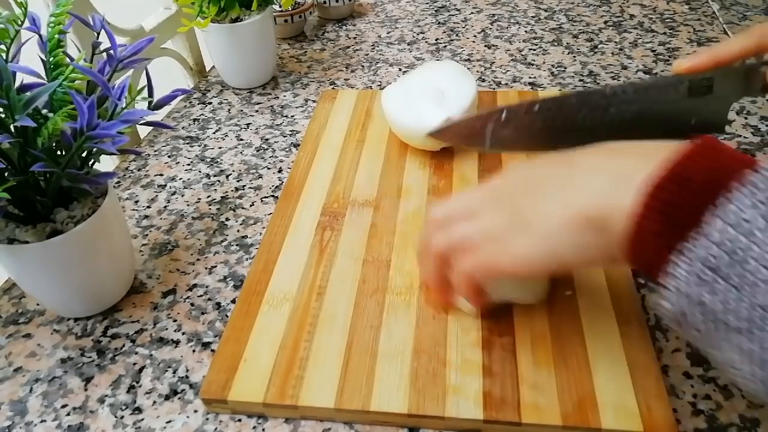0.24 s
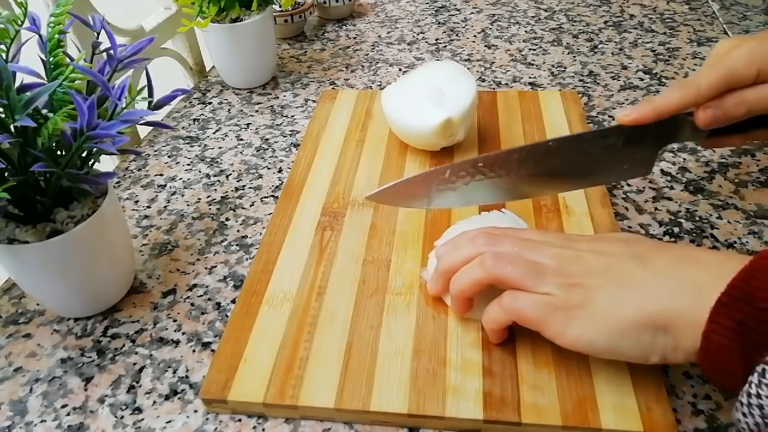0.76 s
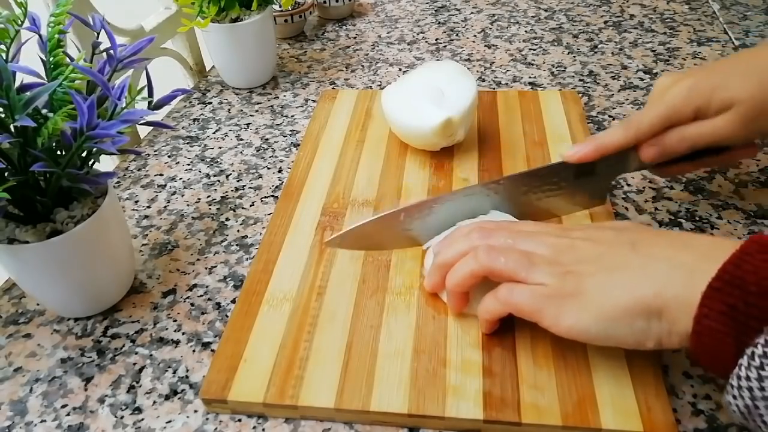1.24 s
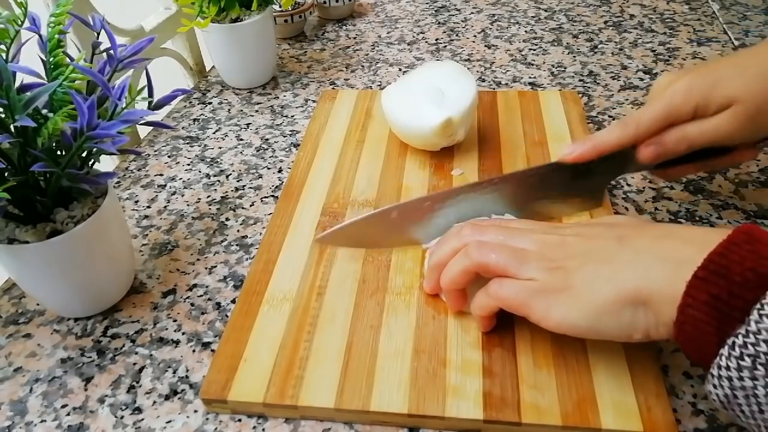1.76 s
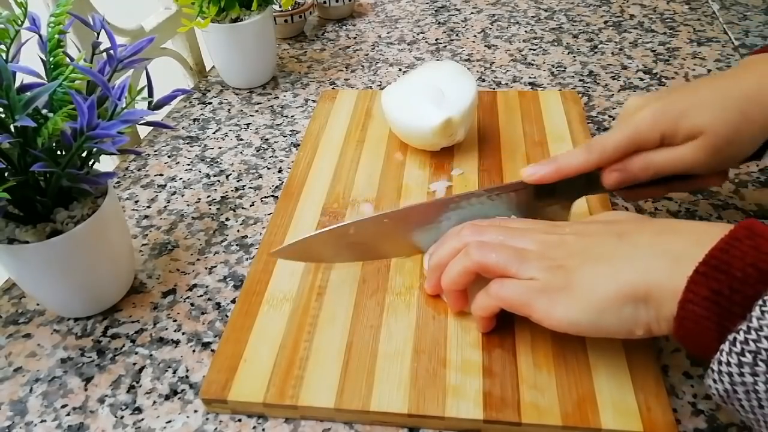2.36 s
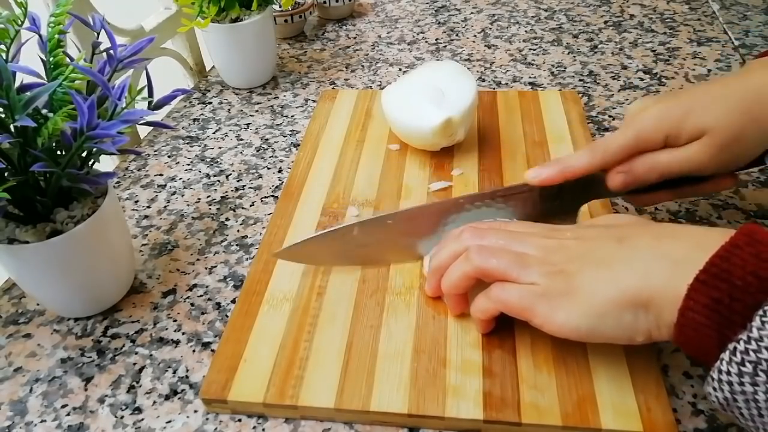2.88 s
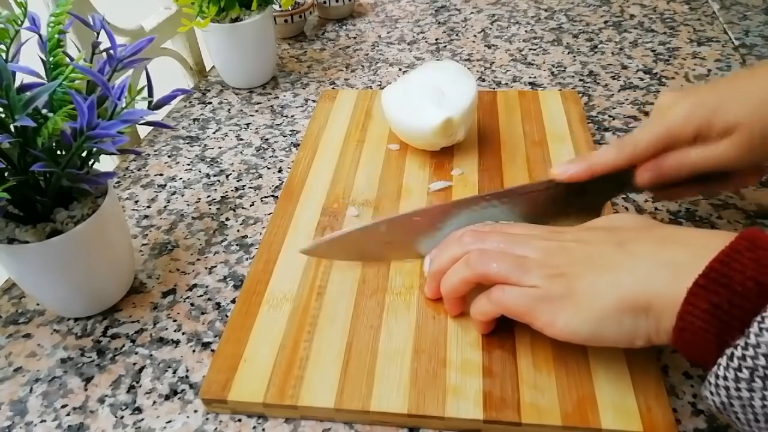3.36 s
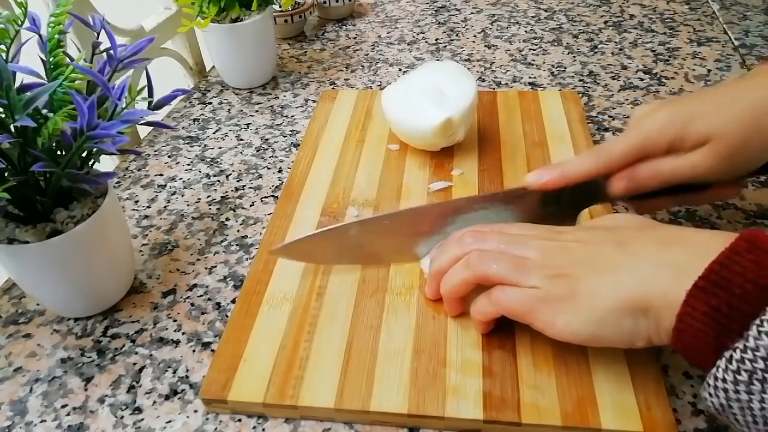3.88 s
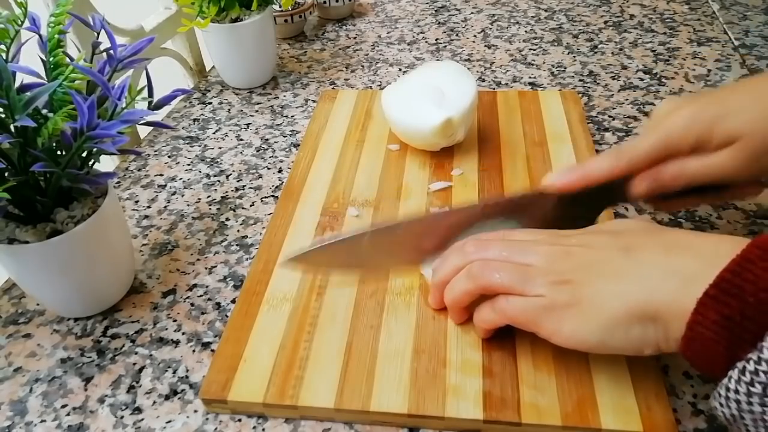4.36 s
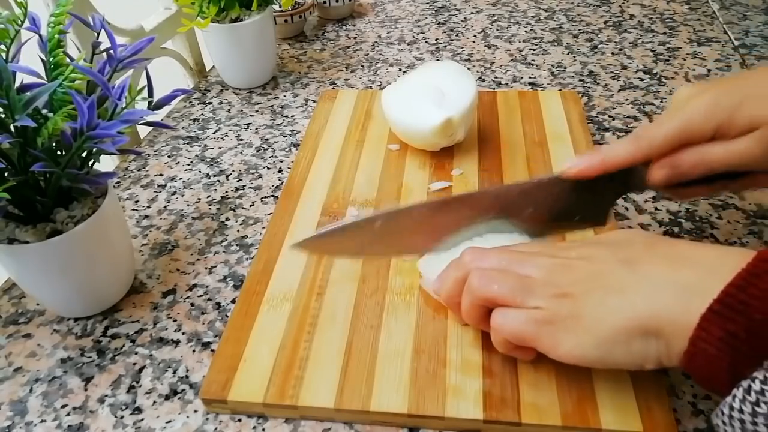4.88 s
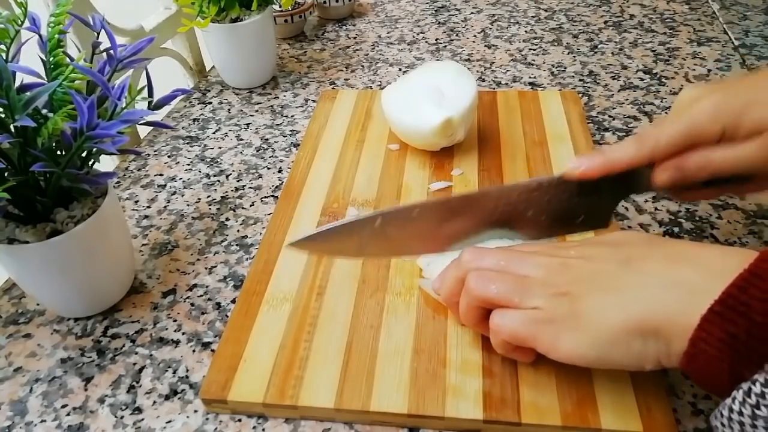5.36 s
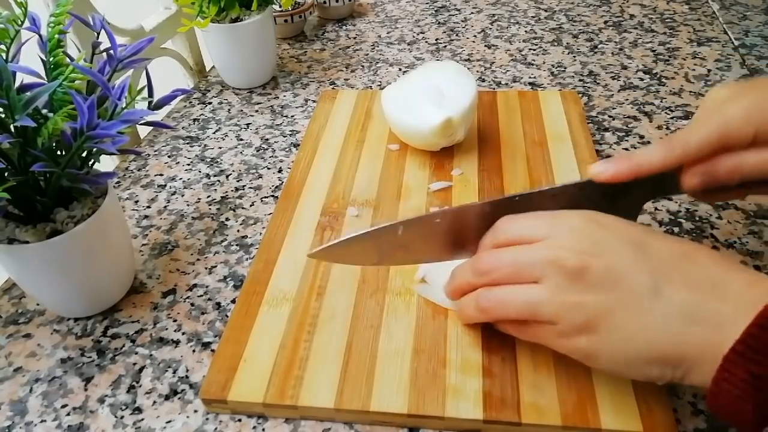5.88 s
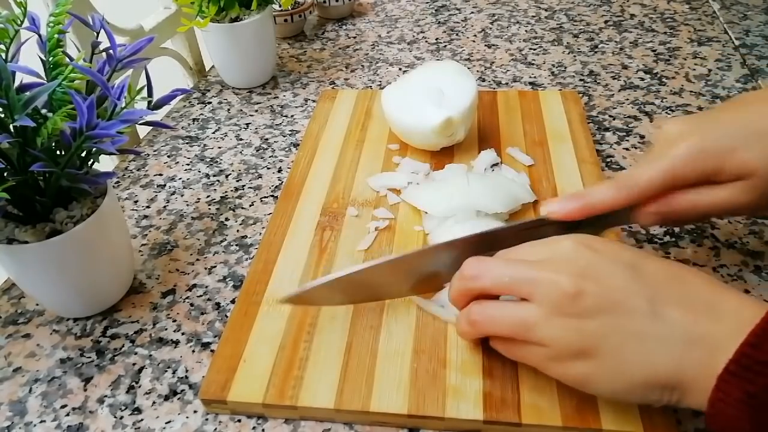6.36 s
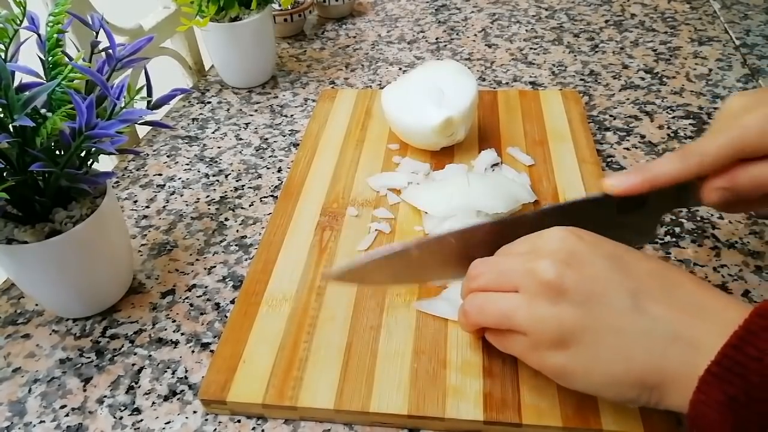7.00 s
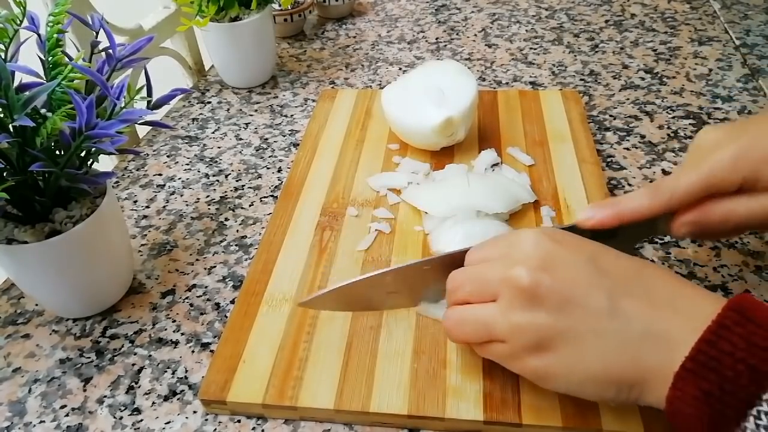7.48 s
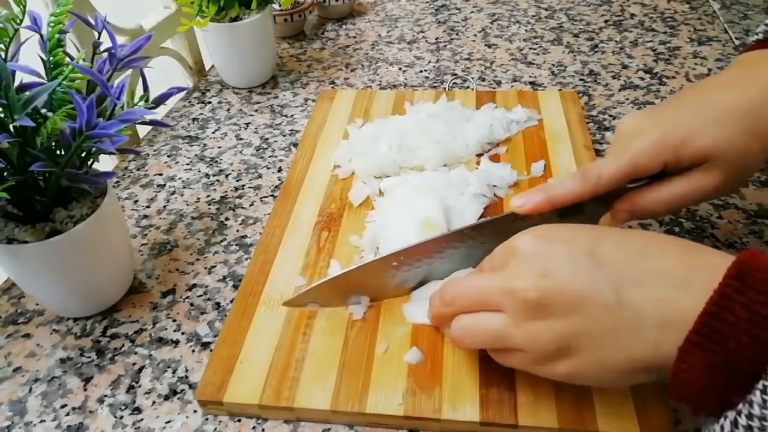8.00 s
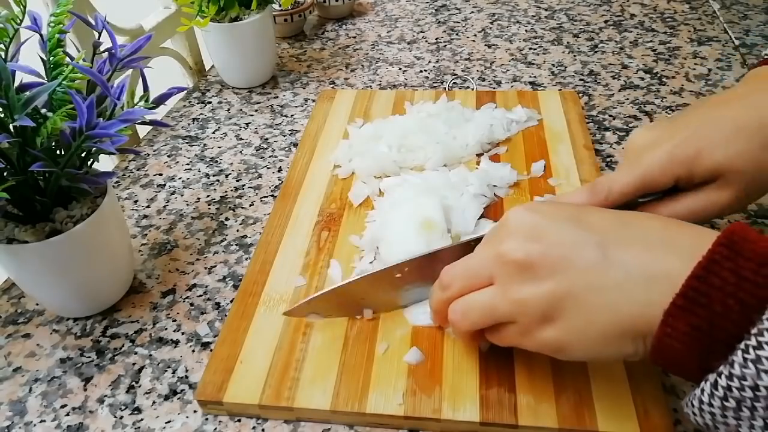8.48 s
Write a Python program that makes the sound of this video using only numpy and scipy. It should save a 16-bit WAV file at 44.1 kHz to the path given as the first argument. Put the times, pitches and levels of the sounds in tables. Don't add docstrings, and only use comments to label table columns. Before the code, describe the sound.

A phone-like stereo microphone sits close to a wooden board on a stone counter. Faint motor hum dies first, then onion layers crackle and snap before each hollow blade knock, some dull, some sharp and bright. Soft hand nudges fall between strokes. Short room echoes and constant hiss surround everything; after a fade and cut, quieter chops resume.

```python
import sys
import numpy as np
from scipy import signal
from scipy.fft import rfft, irfft, next_fast_len
from scipy.io import wavfile
from scipy.ndimage import uniform_filter1d

SR = 44100
rng = np.random.default_rng(int(sys.argv[2]) if len(sys.argv) > 2 else 0)


def waveform_to_disk(signal):
    frames = np.transpose(np.atleast_2d(signal))
    scaled = np.clip(frames, -1, 1) * 32767
    samples = np.round(scaled).astype(np.int16)
    wavfile.write(sys.argv[1], SR, samples)


def ratio_of_db(decibels):
    return 10 ** (np.asarray(decibels, float) / 20)


N = 385434
TIME = np.arange(N) / SR

BLOWS = [(0.9841, -24.5, -4, -14, -11.5), (1.6504, -31, -1.5, -43, -22), (2.1265, -24, 0.5, -11, -21),
         (2.689, -21, 3, -8, -16.5), (3.1854, -19, 9.5, 13, -5.5), (3.7419, -22, -7, -8.5, -23),
         (4.2673, -22.5, 0, -10, -25), (4.7775, -19, 8, 6, -14), (5.3318, -30.5, -13, -34, -16),
         (5.8600, -31, 2, -35, -25), (6.6064, -25.5, 4, 1, -19), (7.0392, -26.5, -3.5, -23, -15.5),
         (7.3533, -31.5, -3.5, -25, -20), (7.7064, -26.5, 5, 8.5, -12), (8.19, -28, 3.5, 3, -13),
         (8.6223, -28, 4.5, 0.5, -18)]
# rise/s, hold/s, crackle level/dB, crunch and rumble level/dB re crackle
SLICES = [(0.058, 0.0084, -41.5, -11, -20), (0.14, .045, -46, -9.5, -26), (0.064, 0.087, -47.5, -5.5, -17),
          (0.19, 0.017, -47, -2, -14), (0.05, 0.012, -48.5, -3.5, -13), (0.19, 0.028, -47, -2, -8),
          (0.079, 0.066, -45, -3, -9.5), (0.086, 0.039, -43, -6.5, -16.5), (0.14, 0.062, -46, -2.5, -11.5),
          (0.026, 0.013, -43.5, -4, -8), (0.025, 0.0094, -52, -3.5, -29), (.04, 0.083, -54, -7, -6),
          (.03, 0.012, -53.5, -7.5, -20), (0.12, 0.034, -58, -4, -14), (.05, 0.042, -53.5, -2.5, -20),
          (0.055, 0.028, -52.5, -4, -11)]
# t/s, peak level/dB, low part level/dB re peak
SNAPS = [(0.9128, -42, -21), (0.9527, -41, 0), (1.6043, -44, -22), (1.6476, -34, -22), (2.0524, -36, -14),
         (2.0788, -28, -19), (2.609, -41, 0), (2.637, -46, 12), (2.6614, -36, 8), (3.6947, -59.5, -15.5),
         (4.1679, -38.5, -17), (4.19, -33.5, -23), (4.1944, -30, -20), (4.2026, -29.5, -32),
         (4.7272, -42, -13), (4.7667, -36, 6), (5.2679, -37, 7), (5.5498, -41, -9), (5.8468, -34, -4),
         (7.886, -40, -21)]
# f/Hz, level/dB, t60/s
LOW_MODES = [(275, -30, 0.01), (322, -14, 0.042), (476, 7.5, 0.07), (560, 5, 0.1), (644, 10.5, 0.039)]
MID_MODES = [(790, -2, 0.18), (948, 9.5, 0.058), (1054, 18.5, 0.036), (1080, -30.5, 0.06),
             (1190, 3.5, 0.016), (1300, -0.5, .022)]
HIGH_MODES = [(1450, -5.5, 0.0083), (1414, 35.5, 0.025), (1700, 0.5, 0.029), (1597, 32.5, 0.078),
              (1676, 10.5, .02), (1980, -12, .02), (2055, 1, 0.026), (2200, 14, 0.033),
              (2480, -6.5, 0.0062), (3100, -11.5, .015)]
# f/Hz, level/dB, t60/s
FLEX_MODES = [(303, 2, 0.45), (316.7, 4.5, 0.29)]
# f/Hz, level/dB, t60/s
THUD_MODES = [(55, 6, 0.1), (85, 4, 0.036)]
# t/s, f/Hz, level/dB
HUM = [
    (0.03, 118, -88),
    (0.1, 117.5, -72.5),
    (0.72, 113, -68),
    (0.86, 111, -81),
]
# t/s, f/Hz, level/dB
SQUEAK = [
    (8.41, 700, -94),
    (8.432, 758, -64),
    (8.492, 724, -57),
    (8.51, 700, -65),
    (8.54, 720, -61),
]
# t/s, peak level/dB, f/Hz
NUDGES = [
    (0.15, -52.5, 390),
    (0.283, -53, 328),
    (2.441, -50, 323),
    (2.476, -51, 410),
    (2.52, -51, 318),
    (2.553, -47, 370),
    (5.62, -50.5, 347),
    (5.684, -52, 360),
    (5.735, -52, 320),
    (8.486, -46, 392),
]
# f/Hz, t60/s
ROOM_T60 = [(150, 1), (400, 0.39), (1000, 0.55), (2500, .3), (6000, 0.41)]
# t/s, level/dB above tail
WALL_ECHOES = [
    (.0095, 2),
    (0.028, 8),
    (.068, 3),
]
# f/Hz, density level/dB per Hz
HISS = [(25, -8.5), (60, -6), (130, -9.5), (300, -1.5), (480, -4), (650, -7.5), (1050, -2.5), (1600, -5.5),
        (2250, -8), (2700, -6), (3300, -10.5), (7000, -9.5), (10000, -10.5), (12000, -10)]
# f/Hz, correlation/1
HISS_LIKENESS = [(60, 0.33), (130, 0.098), (300, 0.3), (600, 0.11), (1200, 0.73), (2500, 0.44),
                 (7000, 0.13)]

SINK_S = 0.0009
BACK_S = 7.509


def blows():
    board, crack, counter = np.zeros((2, N)), np.zeros(N), np.zeros(N)
    scatter_db, counter_db = 1.5, -27
    for s, db, mid_db, high_db, tick_db in BLOWS:
        add(board, ratio_of_db(db) * board_knock(mid_db, high_db, scatter_db), s + SINK_S)
        flex = ring(FLEX_MODES, scatter_db, 0.27, 0.00033, detune=0.012)
        add(board, ratio_of_db(db - 14.5) * pan(flex, 5.0), s + SINK_S)
        tick = pan(burst(2300, 16000, 0.038), 3.9)
        add(board, ratio_of_db(db) * ratio_of_db(tick_db) * tick, s + SINK_S / 2)
        add(crack, ratio_of_db(db) * contact_crack(mid_db, high_db, tick_db), s - SINK_S)
        ring_s = BACK_S - s if s < BACK_S else 1
        add(counter, ratio_of_db(db + counter_db) * counter_ring()[:int(ring_s * SR)], s)
        add(counter, ratio_of_db(db + counter_db - 1.0) * ring(THUD_MODES, scatter_db, 0.13, 0.0027), s)

    direct_db, direct_pan_db = 14, 3.5
    direct = np.roll(crack, int(2 * SINK_S * SR) - 118)
    board = board - ratio_of_db(direct_db) * pan(direct, direct_pan_db)
    slap_delay_s, slap_db = 0.0041, -4.5
    board = board + ratio_of_db(slap_db) * np.roll(board, int(slap_delay_s * SR), axis=1)

    counter_pan_db, wobble_db, right_lag_s = 0, 3, 0.0004
    counter = pan(band(counter, 42, 500) * ratio_of_db(wobble_db * walk(size=1200)), counter_pan_db)
    counter[1] = np.roll(counter[1], int(right_lag_s * SR))
    bass_cut = signal.butter(4, 240, "highpass", fs=SR, output="sos")
    crack = signal.sosfilt(bass_cut, signal.sosfilt(bass_cut, crack))
    return signal.sosfilt(bass_cut, board) + counter, crack


def board_knock(mid_db, high_db, scatter_db):
    low_pan_db, mid_pan_db, high_pan_db = 1.5, 5.3, 2.6
    grain = 0.5
    low = ring(LOW_MODES, scatter_db, 0.1, 0.00015)
    mid = ring(MID_MODES, scatter_db, 0.1, 0.00019) + grain * burst(790, 1013, 0.028)
    high = ring(HIGH_MODES, scatter_db, 0.1, 0.0001) + grain * burst(870, 3300, 0.0084)
    knock = pan(low, low_pan_db)
    knock += ratio_of_db(mid_db) * pan(mid, mid_pan_db)
    knock += ratio_of_db(high_db) * pan(high, high_pan_db)
    return knock


def contact_crack(mid_db, high_db, tick_db):
    crack_hz = (330, 600, 1050, 2100, 4200)
    levels_db = (-1.5, -1.5, mid_db + 0.0, high_db - 7.0, tick_db - 13.5)
    size = 256
    hz = np.maximum(np.arange(size // 2 + 1) * SR / size, 1)
    pulse = irfft(ratio_of_db(on_log(hz, list(zip(crack_hz, levels_db)))))
    return np.roll(pulse, size // 2) * np.hanning(size)


def counter_ring():
    hz, beat_hz, beat_phase_rad, t60_s = 129, 5.0, 0.68, 1
    t = np.arange(SR) / SR
    swell = 1 - np.exp(-t / 0.0013)
    beat = np.cos(np.pi * beat_hz * t - beat_phase_rad)
    return swell * ratio_of_db(-60 * t / t60_s) * beat * np.sin(2 * np.pi * hz * t)


def onion():
    crackle, crunch, rumble = strokes()
    cells_per_s = 3500
    size_db = np.minimum(3.0 * rng.exponential(size=N), 12)
    cells = (rng.random(N) < cells_per_s / SR) * rng.standard_normal(N) * ratio_of_db(size_db)
    cells = unit(cells) + 0.48 * rng.standard_normal(N)
    high = crackle * ratio_of_db(-4.5) * unit(band(cells, 3000, 15000))
    flesh = ratio_of_db(-13) * unit(band(cells, 990, 1560))
    low = crunch * (unit(band(cells, 190, 4300)) + flesh)
    for s, db, low_db in SNAPS:
        add(high, ratio_of_db(db) * burst(3600, 15000, 0.003), s)
        add(low, ratio_of_db(db + low_db - 5.0) * burst(820, 1500, 0.016), s)
    rock = rng.standard_normal(N) + 0.59 * rng.standard_normal((2, N))
    rock = unit(band(rock, 30, 130))
    return pan(high, 12.3) + pan(low, 11.0), uniform_filter1d(rumble, size=1500) * rock


def strokes():
    rise_db, sag_db_per_s = 22.5, 16
    jerk_db, jerk_s = 3, 0.0078
    gains = np.zeros((3, N))
    for (lands, *_), (rise, hold, db, crunch_db, rumble_db) in zip(BLOWS, SLICES):
        since = TIME - (lands - hold)
        shape_db = np.where(since < 0, rise_db * since / rise, -sag_db_per_s * since)
        parts_db = np.array([[0], [crunch_db], [rumble_db]])
        gains += ratio_of_db(db + shape_db + parts_db) * (TIME < lands)
    jerks = [ratio_of_db(jerk_db * walk(size=int(jerk_s * SR))) for _ in range(2)]
    return gains[0] * jerks[0], gains[1] * jerks[1], gains[2]


def small_sounds():
    out = tone(HUM) + tone(SQUEAK)
    out = out * ratio_of_db(2.3 * walk(size=1500) * (TIME < HUM[-1][0]))
    for s, db, hz in NUDGES:
        modes = [(hz, 0, 0.09), (1.22 * hz, -3, 0.07)]
        add(out, ratio_of_db(db) * ring(modes, 1.0, 0.2, 0.0017), s)
    return out


def tone(track):
    phase = 2 * np.pi * np.cumsum(curve(track, 1, 100)) / SR
    return np.sqrt(2) * ratio_of_db(curve(track, 2, -120)) * np.sin(phase)


def room(x):
    spread_s, treble_pan_db = 0.0032, 3.5
    t = np.arange(SR // 2) / SR
    clusters_db = sum(db * np.exp(-((t - s) / spread_s) ** 2) for s, db in WALL_ECHOES)
    tail = 0
    for hz in 90 * 2 ** np.arange(7):
        shared, own = rng.standard_normal(len(t)), rng.standard_normal((2, len(t)))
        apart = min(0.28 + hz / 1200, 1)
        noise = np.sqrt(1 - apart ** 2) * shared + apart * own
        noise = band(noise, hz / np.sqrt(2), hz * np.sqrt(2))
        noise = pan(noise, treble_pan_db * min(hz / 2500, 1))
        tail = tail + noise * ratio_of_db(clusters_db - 60 * t / on_log(hz, ROOM_T60))
    tail = tail * np.clip((t - 0.002) / 0.0038, 0, 1)
    tail = tail / np.sqrt(np.sum(tail ** 2) / 2)
    before = TIME < BACK_S
    early = signal.fftconvolve((x * before)[None], tail, axes=1)[:, :N]
    late = signal.fftconvolve((x * ~before)[None], tail, axes=1)[:, :N]
    return early * before + late


def hiss():
    size = next_fast_len(N)
    hz = np.maximum(np.arange(size // 2 + 1) * SR / size, 1)
    like = np.clip(on_log(hz, HISS_LIKENESS), -1, 1)
    spectra = rfft(rng.standard_normal((2, size))) * ratio_of_db(on_log(hz, HISS))
    mid, side = spectra * np.sqrt([1 + like, 1 - like])
    noise = irfft(np.array([mid + side, mid - side]), size)[:, :N]
    low = band(noise, 300, 1400)
    return unit(noise + low * (ratio_of_db(1.3 * walk(size=3000)) - 1)) * ratio_of_db(-53)


def ring(modes, scatter_db, seconds, contact_s, detune=0.008):
    t = np.arange(int(seconds * SR)) / SR
    hz, db, t60 = np.array(modes).T[:, :, None]
    luck = rng.standard_normal((2, len(modes), 1))
    decay = ratio_of_db(db + scatter_db * luck[0] - 60 * t / t60)
    sound = -np.sum(decay * np.sin(2 * np.pi * hz * (1 + detune * luck[1]) * t), axis=0)
    sound = np.convolve(sound, np.hanning(int(contact_s * SR) + 3))[:len(t)]
    return sound / np.abs(sound).max()


def burst(lo_hz, hi_hz, t60):
    t = np.arange(SR // 10) / SR
    sound = band(rng.standard_normal(len(t)) * ratio_of_db(-60 * t / t60), lo_hz, hi_hz)
    return sound / np.abs(sound).max()


def walk(size):
    slow = uniform_filter1d(rng.standard_normal(N), size=size)
    return unit(uniform_filter1d(slow, size=size))


def band(x, lo_hz, hi_hz):
    return signal.sosfilt(signal.butter(2, [lo_hz, hi_hz], "bandpass", fs=SR, output="sos"), x)


def unit(x):
    return x / np.sqrt(np.mean(x ** 2))


def curve(table, column, rest):
    rows = np.array(table)
    return np.interp(TIME, rows[:, 0], rows[:, column], rest, rest)


def on_log(hz, table):
    rows = np.array(table)
    return np.interp(np.log(hz), np.log(rows[:, 0]), rows[:, 1])


def add(out, sound, s):
    i = int(s * SR)
    out[..., i:i + sound.shape[-1]] += sound[..., :N - i]


def pan(x, db):
    return x * ratio_of_db(np.array([[db], [-db]]) / 2)


def late_left(x):
    return np.array([np.roll(x[0], 16), x[1]])


def edit():
    fade_from_s, fade_to_s, mute_s = 5.85, 7.485, 7.449
    back_db, back_rise_s, silence_db = -3.5, 0.02, -43
    fade = np.clip((fade_to_s - TIME) / (fade_to_s - fade_from_s), 0, 1) * (TIME < mute_s)
    back = ratio_of_db(back_db) * np.clip((TIME - BACK_S) / back_rise_s, 0, 1)
    return np.maximum(np.maximum(fade, back), ratio_of_db(silence_db))


def scene():
    knocks, crack = blows()
    crackle, rock = onion()
    near = knocks + rock + small_sounds() + late_left(crackle + hiss())
    return near + room(ratio_of_db(27) * crack + ratio_of_db(-6) * crackle.mean(axis=0))


def roll_off(x):
    return signal.sosfilt(signal.butter(12, 12290, fs=SR, output="sos"), x)


def record(dry):
    port_hz, port_q, shade_hz = 7617, 5.4, 5260
    ceiling, top_hz = 0.31, 11340
    w = 2 * SR * np.tan(np.pi * port_hz / SR)
    left = signal.lfilter(*signal.bilinear([w ** 2], [1, w / port_q, w ** 2], SR), dry[0])
    right = signal.lfilter(*signal.butter(1, shade_hz, fs=SR), dry[1])
    heard = ceiling * np.tanh(np.array([left, right]) / ceiling) * edit()
    heard = signal.sosfilt(signal.ellip(6, 1, 50, top_hz, fs=SR, output="sos"), heard)
    return roll_off(heard)


dry = scene()
out = record(dry)
waveform_to_disk(out)
```